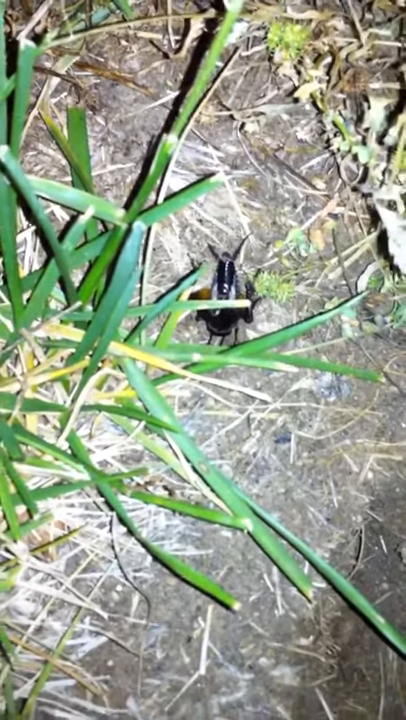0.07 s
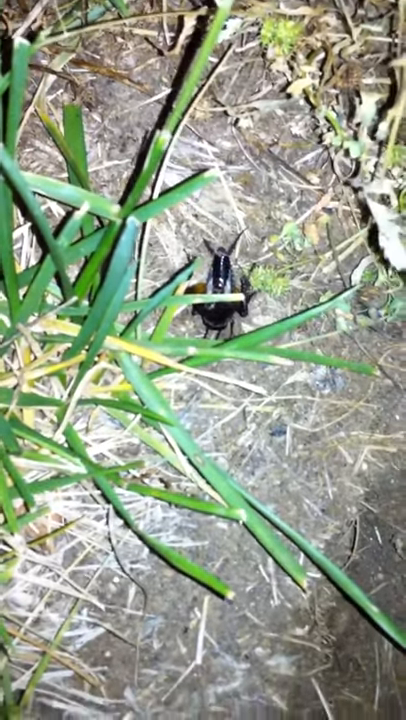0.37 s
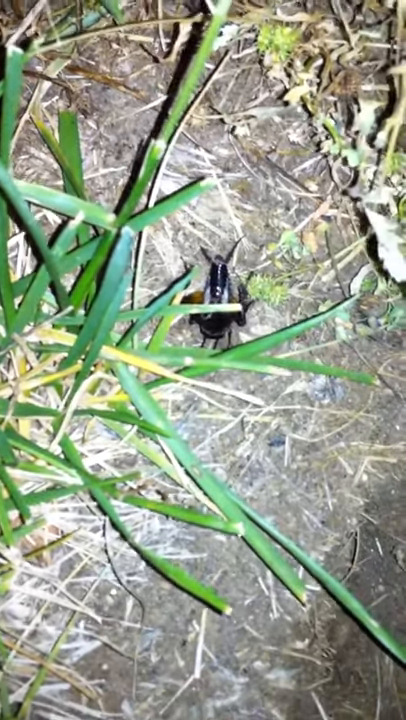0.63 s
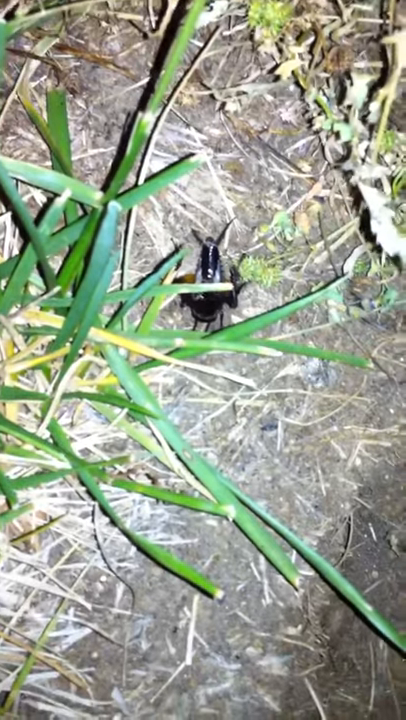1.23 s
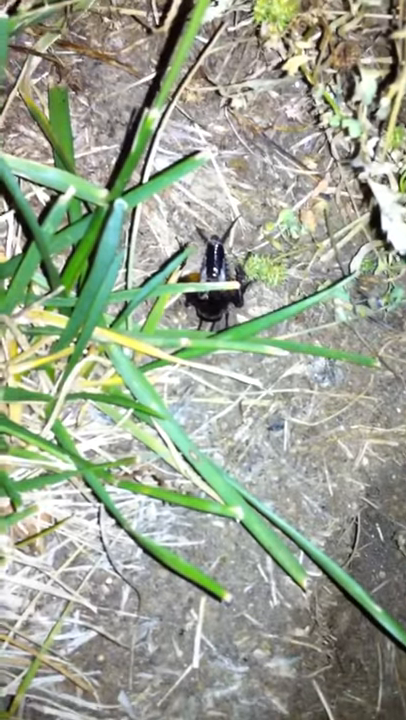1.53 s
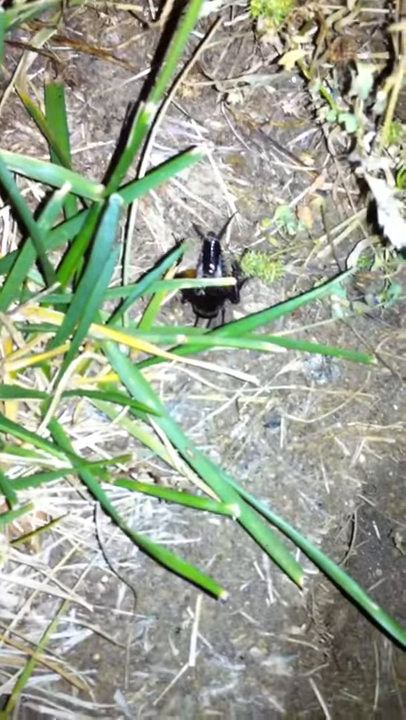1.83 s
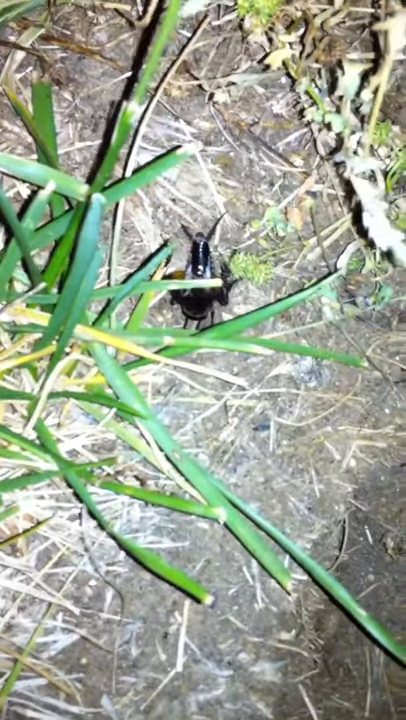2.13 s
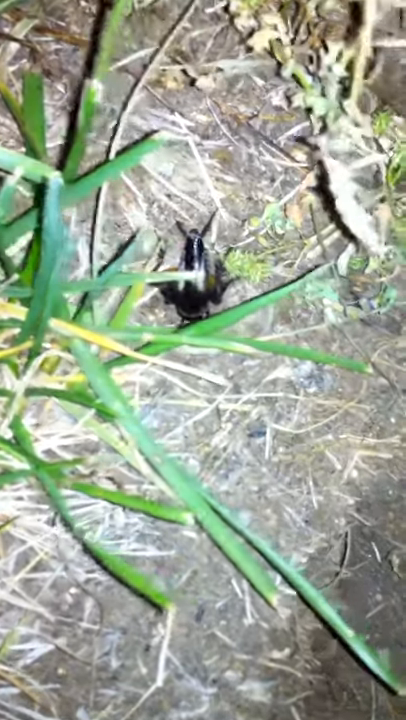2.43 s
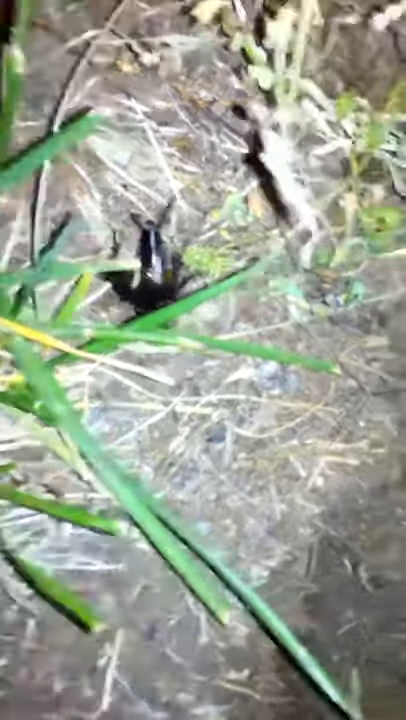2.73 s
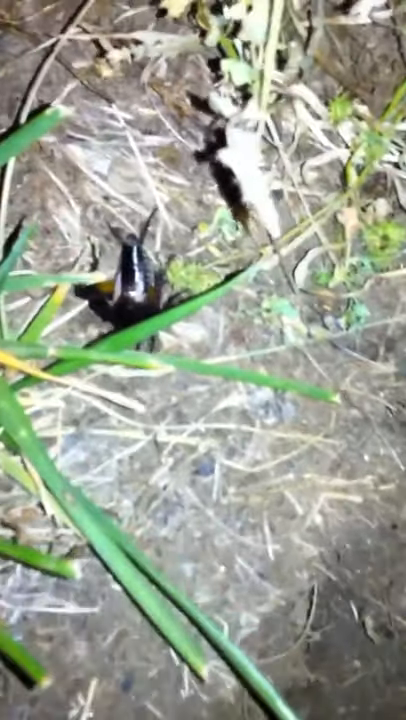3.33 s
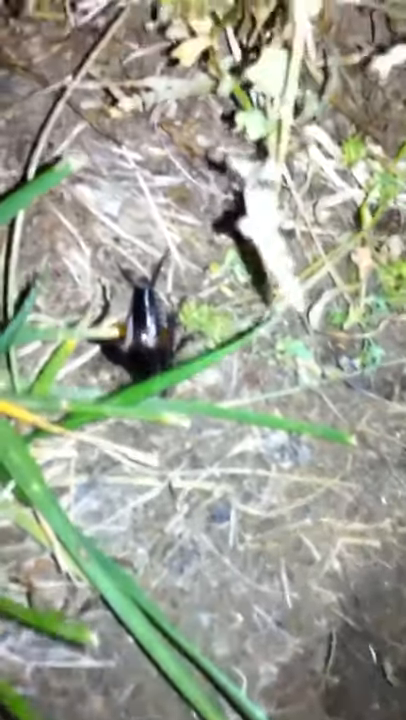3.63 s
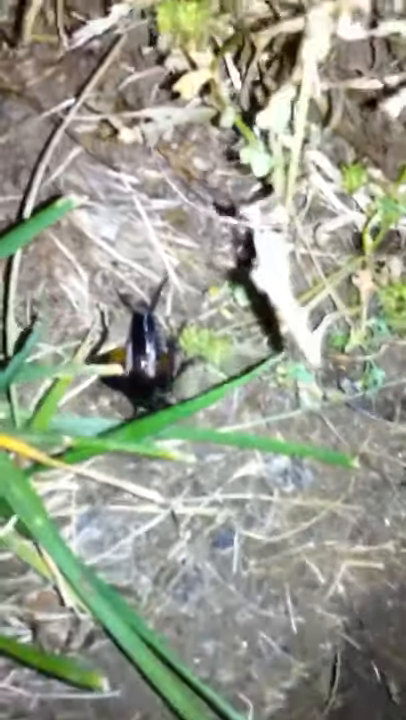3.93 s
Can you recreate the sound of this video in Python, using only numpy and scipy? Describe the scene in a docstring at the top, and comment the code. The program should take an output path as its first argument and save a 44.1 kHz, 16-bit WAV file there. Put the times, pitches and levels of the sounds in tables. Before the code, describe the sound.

A cricket chirps close to the microphone in grass at night, in loud, high, evenly spaced trills. It rests briefly, then chirps three more times. Faint distant traffic rumbles under a soft hiss throughout.

```python
"""Night: distant traffic rumbles and the air hisses throughout; close by, a field cricket is mid-chirp.
Each chirp is six or seven wing strokes: the scraper catches, rasps over the file and lets go, the wing
rings with a falling tone and overtones, then squeaks as it reopens. A far engine swells near 0.4 s.
From 0.6 s the scraper snags now and then; from about 1.3 s a faint far whine comes and goes.
The cricket rests from 2.6 s to 3.1 s, then chirps three more times as the engine swells again."""
import sys
import numpy as np
from scipy import signal
from scipy.fft import rfft, irfft
from scipy.io import wavfile

SR = 44100
rng = np.random.default_rng(int(sys.argv[2]) if len(sys.argv) > 2 else 0)


def wav_out(sig):
    """Save sig, one row per channel (or a flat mono array), as 16-bit PCM at SR to the path in sys.argv[1]."""
    wavfile.write(sys.argv[1], SR, np.round(np.clip(np.atleast_2d(sig).T, -1, 1) * 32767).astype(np.int16))


N = 176400
T = np.arange(N) / SR


def from_db(db):
    """Decibels to gain."""
    return 10 ** (np.asarray(db) / 20)


def unit_rms(x):
    """Scale to rms 1."""
    return x / np.sqrt(np.mean(x ** 2) + 1e-20)


def drift(rate_hz):
    """Smooth random wander, rms 1."""
    pole = np.exp(-2 * np.pi * rate_hz / SR)
    return unit_rms(signal.lfilter([1], [1, -2 * pole, pole * pole], rng.standard_normal(N + SR))[SR:])


def noise(spectrum):
    """Coloured noise, rms 1."""
    hz, db = np.transpose(spectrum)
    bins_hz = np.maximum(np.arange(N // 2 + 1) * SR / N, 1)
    gain = from_db(np.interp(np.log(bins_hz), np.log(hz), db))
    return unit_rms(irfft(rfft(rng.standard_normal(N)) * gain, N))


def span(start_s, end_s):
    """Sample slice between two times."""
    return slice(*np.searchsorted(T, [start_s, end_s]))


def bell(centre_s, sigma_s, peak_db):
    """Gaussian envelope."""
    envelope = np.zeros(N)
    near = span(centre_s - 4 * sigma_s, centre_s + 4 * sigma_s)
    envelope[near] = from_db(peak_db) * np.exp(-.5 * ((T[near] - centre_s) / sigma_s) ** 2)
    return envelope


# Traffic spectra, low and mid: (frequency [Hz], relative density [dB])
RUMBLE_SPECTRUM = [(20, -33), (45, -40), (62, -27), (100, -10), (145, -1.5), (205, 1), (270, -8.5),
                   (350, -17.5), (600, -42.5), (1500, -29), (4000, -72)]
ROAD_SPECTRUM = [(100, -15), (250, 2.5), (400, -2), (520, -3.5), (750, -5.5), (1000, -11), (1400, -15),
                 (2000, -20), (3000, -34), (6000, -27)]
# Traffic envelopes, low and mid: (time [s], level before trim [dB])
RUMBLE_ENVELOPE = [(0.0, -49), (0.03, -44.5), (0.08, -50), (0.28, -45.5), (0.33, -51), (0.88, -49),
                   (0.96, -54), (1.4, -52), (1.58, -46), (1.61, -52), (1.94, -47.5), (1.97, -51),
                   (3.03, -51), (3.12, -46.5), (3.19, -50.5), (3.92, -50), (3.94, -42), (4.0, -48)]
ROAD_ENVELOPE = [(0.0, -64.5), (0.5, -61), (0.63, -57), (0.66, -64), (1.18, -65.5), (1.22, -61),
                 (1.25, -66), (1.53, -58.5), (1.59, -67), (2.21, -60), (2.23, -68), (3.36, -67.5),
                 (3.46, -62), (3.54, -65), (3.71, -68), (3.98, -64), (3.99, -62), (4.0, -62)]
def traffic(rumble_trim_db=0.1, road_trim_db=3.5):
    """Distant traffic: low rumble and midrange, each swelling unevenly."""
    rumble_db = np.interp(T, *np.transpose(RUMBLE_ENVELOPE)) + rumble_trim_db
    road_db = np.interp(T, *np.transpose(ROAD_ENVELOPE)) + road_trim_db
    return from_db(rumble_db) * noise(RUMBLE_SPECTRUM) + from_db(road_db) * noise(ROAD_SPECTRUM)


# Night air: (frequency [Hz], relative density [dB])
AIR_SPECTRUM = [(500, -5), (2500, 1), (5000, 1.3), (9000, -4), (17000, -1.5)]
def night_air(level_db=-67):
    """Even hiss."""
    return from_db(level_db) * noise(AIR_SPECTRUM)


# Chirps: (first stroke centre [s], strokes [count], level [dB], pitch [Hz], 2nd harmonic [dB],
# 3rd harmonic [dB], gap scale [ratio], late dip in each stroke [0-1])
CRICKET_CHIRPS = [(-.1036, 7, -25, 4367, -19, 1, 0.99, 0.16), (0.2869, 7, -26, 4346, -16.5, 1, 0.96, 0.08),
                  (0.6268, 6, -25, 4348, -16.5, 0, 1.016, 0.23),
                  (0.9825, 7, -25.5, 4353, -16, 0.5, 0.99, 0.05),
                  (1.3494, 7, -25.1, 4356, -18, -0.3, 1.014, 0.12), (1.723, 7, -24.5, 4360, -17, 0, 1, 0),
                  (2.0839, 7, -25, 4373, -17, -0.3, 0.98, 0), (2.433, 7, -26.0, 4358, -13, -1, 1.004, 0.76),
                  (3.158, 7, -23.4, 4385, -12, -4, 0.98, 0.23), (3.5414, 7, -24, 4400, -11, -3, 0.98, 0),
                  (3.8861, 7, -23.5, 4380, -11.5, -2, 1.02, 0.05)]
def wing_strokes(base_gap_s=.0193, gap_growth_s=.00092, rise_hz=7.2, spread_db=.5):
    """Closing strokes slow down, strengthen and rise in pitch through a chirp."""
    first_stroke_db, restart_db, long_rest_s = -4, -5.5, .6
    previous_s = CRICKET_CHIRPS[0][0]
    for start_s, count, db, hz, second_db, third_db, gap_scale, dip in CRICKET_CHIRPS:
        warm_up_db = first_stroke_db + restart_db * (start_s - previous_s > long_rest_s)
        previous_s = start_s
        for k in range(count):
            centre_s = start_s + gap_scale * (k * base_gap_s + gap_growth_s * k * (k - 1) / 2)
            stroke_db = db + warm_up_db * np.exp(-k) + spread_db * rng.normal()
            stroke_hz = hz + rise_hz * (k - count / 2)
            yield centre_s, k, k == count - 1, stroke_db, stroke_hz, second_db, third_db, dip


def stroke_arch(progress, peak_at, steepness, bite_at=.1, bite_width=.02):
    """The scraper bites suddenly; the level arches as progress runs from 0 to 1."""
    skew = np.log(.5) / np.log(peak_at)
    bite = .5 + .5 * np.tanh((progress - bite_at) / bite_width)
    return bite * np.abs(np.sin(np.pi * progress ** skew)) ** steepness


STROKE_S = 0.018
# Wing harmonics 1-3: (peak position in stroke [0-1], flank steepness [exponent], flutter [dB])
WING_HARMONICS = [(0.5, 1.79, 0.72), (0.46, 1.25, 1.5), (.40, 2.7, 0.1)]
def wing_tone(strokes):
    """The file's teeth drive the wing at a falling rate, unevenly at both ends of a stroke."""
    sag_hz, end_drop_hz, easing_per_stroke = 158, 927, 0.098
    tooth_jitter_hz, edge_jitter_hz = 4.2, 188
    dip_at, dip_width, fourth_db = 0.63, 0.13, -18.5
    pitch_hz, envelopes = np.zeros(N), np.zeros((len(WING_HARMONICS), N))
    jitter = drift(rate_hz=900)
    for centre_s, k, _, db, hz, second_db, third_db, dip in strokes:
        near = span(centre_s - STROKE_S / 2, centre_s + STROKE_S / 2)
        progress = np.clip((T[near] - centre_s) / STROKE_S + .5, 0, 1)
        drop_hz = end_drop_hz * (1 - easing_per_stroke * k) * progress ** 7
        jitter_hz = tooth_jitter_hz + edge_jitter_hz * (1 - np.sin(np.pi * progress)) ** 2
        pitch_hz[near] = hz - sag_hz * (progress - .5) - drop_hz + jitter_hz * jitter[near]
        for n, harmonic_db in enumerate((0, second_db, third_db)):
            peak_at, steepness, _ = WING_HARMONICS[n]
            envelopes[n, near] = from_db(db + harmonic_db) * stroke_arch(progress, peak_at, steepness)
        envelopes[0, near] *= 1 - dip * np.exp(-((progress - dip_at) / dip_width) ** 2)
    phase = 2 * np.pi * np.cumsum(pitch_hz) / SR
    tone = from_db(fourth_db) * envelopes[0] * np.sin(4 * phase)
    for n, (_, _, flutter_db) in enumerate(WING_HARMONICS):
        tone += envelopes[n] * from_db(flutter_db * drift(rate_hz=336)) * np.sin((n + 1) * phase)
    return tone


# File rasp and scraper tick: (frequency [Hz], relative density [dB])
RASP_SPECTRUM = [(2000, -18), (3000, -61), (3800, 4), (4800, -2.5), (5500, -9), (6300, -14), (7300, -28),
                 (8600, 1), (10000, -5.5), (11300, -11), (12500, 10.5), (14200, -3.5), (15500, 8),
                 (17500, -8.5)]
TICK_SPECTRUM = [(2000, -50), (3200, -45), (4600, 11.5), (5500, -6.5), (6300, 4), (7400, -11.5),
                 (9000, -7.5), (11000, 4), (13000, 6), (17500, -5.5)]
def wing_friction(strokes):
    """Wings squeak open; the scraper catches, rasps, lets go; after a chirp the wings rustle to rest."""
    open_lead_s, catch_lead_s, release_lag_s, settle_lag_s = 0.01058, 0.0057, 0.00545, .017
    tick_sigma_s, catch_fade_db, release_growth_db = 0.00072, 1.7, 3.14
    squeak_hz, wander_hz, first_open_db = 13320, 450, -17
    spread_db, grit_db = 5, 4.5
    rasp, ticks, squeak = np.zeros((3, N))
    for centre_s, k, is_last, db, *_ in strokes:
        catch_db, release_db, open_db = db + rng.uniform(-spread_db, spread_db, 3)
        open_db += first_open_db * (k == 0)
        squeak += bell(centre_s - open_lead_s, sigma_s=0.0013, peak_db=open_db - 8.5)
        rasp += bell(centre_s - open_lead_s, sigma_s=0.0018, peak_db=open_db - 23)
        ticks += bell(centre_s - catch_lead_s, tick_sigma_s, catch_db - 13 - catch_fade_db * k)
        rasp += bell(centre_s, sigma_s=STROKE_S / 4, peak_db=db - 16)
        ticks += bell(centre_s + release_lag_s, tick_sigma_s, release_db - 28.5 + release_growth_db * k)
        if is_last:
            rasp += bell(centre_s + settle_lag_s, sigma_s=0.0026, peak_db=db - 17)
    grit = unit_rms(from_db(grit_db * np.clip(drift(rate_hz=530), -2, 2)))
    squeak_phase = 2 * np.pi * np.cumsum(squeak_hz + wander_hz * drift(rate_hz=900)) / SR
    return rasp * grit * noise(RASP_SPECTRUM) + ticks * noise(TICK_SPECTRUM) + squeak * np.sin(squeak_phase)


def ground_echoes(source, scatter_db=-23, scatter_t60_s=0.085, tail_db=-32.5, tail_t60_s=0.45):
    """Quick scatter from ground and grass, then a faint dull tail."""
    t, echoes = T[:SR // 2], np.zeros(N)
    for db, t60_s in ((scatter_db, scatter_t60_s), (tail_db, tail_t60_s)):
        response = rng.standard_normal(len(t)) * from_db(-60 * t / t60_s)
        echoes += from_db(db) * signal.fftconvolve(source, response / np.linalg.norm(response))[:N]
    return signal.sosfilt(signal.butter(2, 8100, fs=SR, output="sos"), echoes)


# Engine swells: (centre [s], sigma [s], firing rate [Hz], rise [Hz/s], bend [Hz/s^2], level [dB])
ENGINE_PASSES = [(0.421, 0.41, 56.35, 4.05, -38, -64.5), (3.549, 0.31, 51.87, 3, -34, -66.5)]
# Engine orders: (multiple of firing rate [ratio], relative level [dB])
ENGINE_HARMONICS = [(4, 7.5), (5, 2.5), (6, 1), (7, -3), (8, 2), (9, -5), (13, -12.5)]
def far_engine(fading_db=3):
    """Engine orders rise, fall back and fade unevenly with distance."""
    engine = np.zeros(N)
    for centre_s, sigma_s, hz, rise, bend, db in ENGINE_PASSES:
        swell = bell(centre_s, sigma_s, db)
        firing_hz = hz + rise * (T - centre_s) + bend * (T - centre_s) ** 2
        phase = 2 * np.pi * np.cumsum(firing_hz) / SR
        for order, order_db in ENGINE_HARMONICS:
            engine += swell * from_db(order_db + fading_db * drift(rate_hz=4.4)) * np.sin(order * phase)
    return engine


# Scraper snags: (time [s], level before trim [dB])
SCRAPER_SNAGS = [(0.621, -36.5), (0.6389, -30.5), (0.7514, -34), (0.9939, -35), (1.3608, -37),
                 (1.3828, -36), (2.4648, -35), (3.1872, -46), (3.5341, -40.5), (3.5523, -43),
                 (3.8814, -31.5), (3.919, -36.5)]
def scraper_snaps(decay_s=0.0037, trim_db=0.5):
    """The scraper snags and snaps free."""
    envelope = np.zeros(N)
    for start_s, db in SCRAPER_SNAGS:
        near = span(start_s, start_s + 10 * decay_s)
        envelope[near] += from_db(db + trim_db) * np.exp(-(T[near] - start_s) / decay_s)
    return envelope * noise(TICK_SPECTRUM)


# Whine swells: (centre [s], sigma [s], pitch [Hz], glide [Hz/s], level [dB])
WHINE_SWELLS = [(1.3, 0.14, 1278, 401, -69), (2.376, 0.16, 1320, 0.5, -72), (3.257, .17, 1324, 1.5, -69)]
def far_whine():
    """A faint wavering tone, three times; the first glides up."""
    whine = np.zeros(N)
    wander_hz = 6.96 * drift(rate_hz=37)
    for centre_s, sigma_s, hz, glide, db in WHINE_SWELLS:
        pitch_hz = hz + glide * (T - centre_s) + wander_hz
        whine += bell(centre_s, sigma_s, db) * np.sin(2 * np.pi * np.cumsum(pitch_hz) / SR)
    return whine


def scene(wing_cutoff_hz=3200):
    """The cricket close up, the night behind it; mono."""
    strokes = list(wing_strokes())
    wings = wing_tone(strokes) + wing_friction(strokes) + scraper_snaps()
    # Small wings radiate no bass.
    cricket = signal.sosfilt(signal.butter(6, wing_cutoff_hz, "high", fs=SR, output="sos"), wings)
    return (traffic() + night_air() + cricket + ground_echoes(cricket) + far_engine() + far_whine())[None]


def record(dry, cutoff_hz=17300):
    """Steep low-pass."""
    return signal.sosfilt(signal.ellip(10, .1, 70, cutoff_hz, fs=SR, output="sos"), dry)


dry = scene()
out = record(dry)
wav_out(out)
```